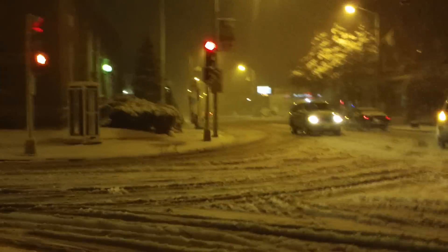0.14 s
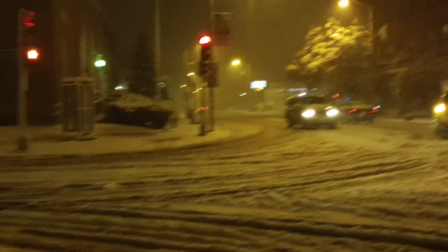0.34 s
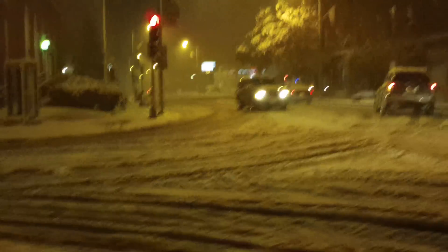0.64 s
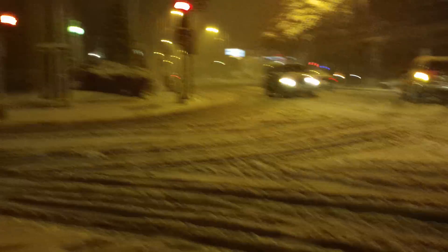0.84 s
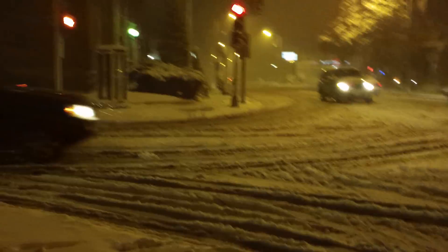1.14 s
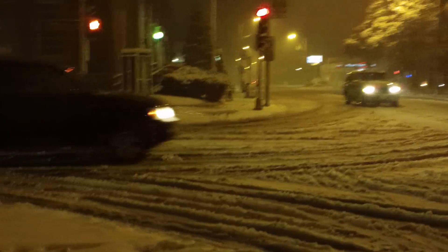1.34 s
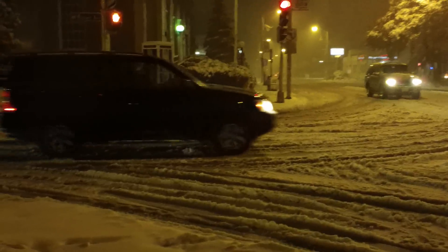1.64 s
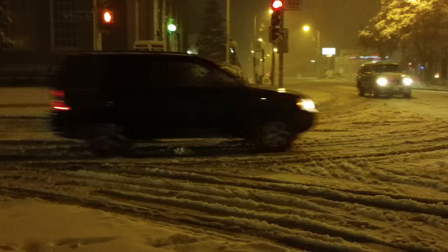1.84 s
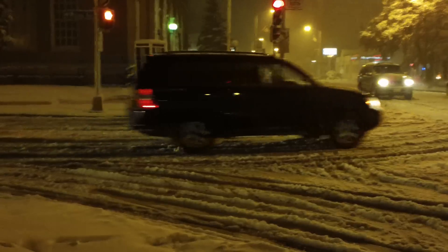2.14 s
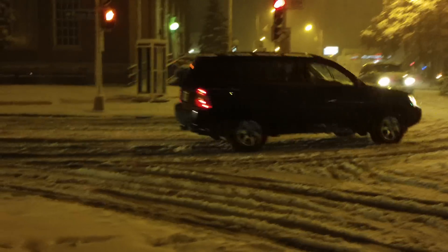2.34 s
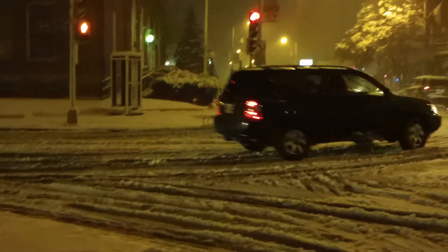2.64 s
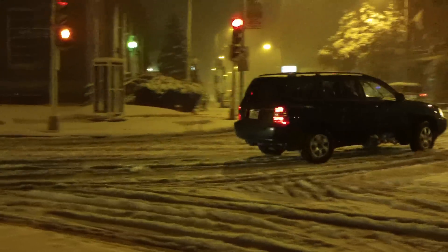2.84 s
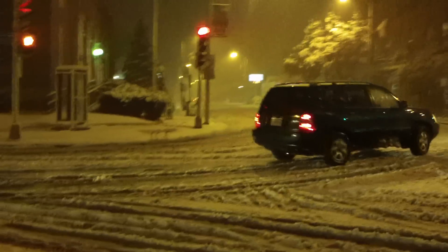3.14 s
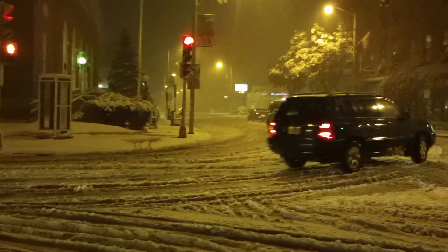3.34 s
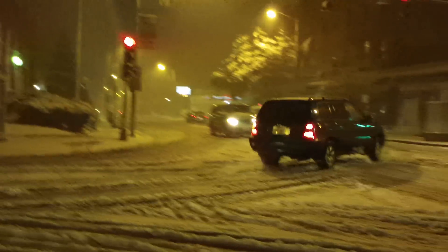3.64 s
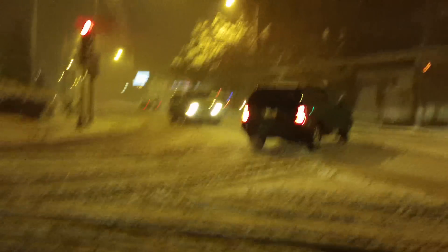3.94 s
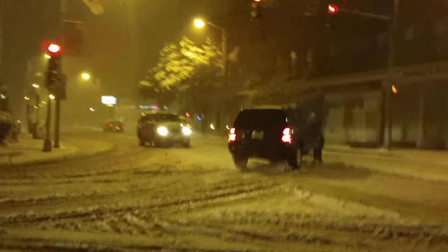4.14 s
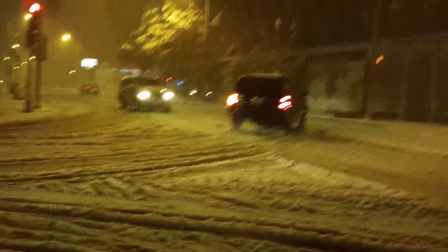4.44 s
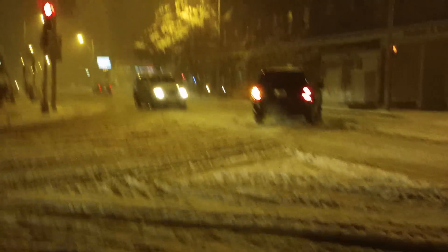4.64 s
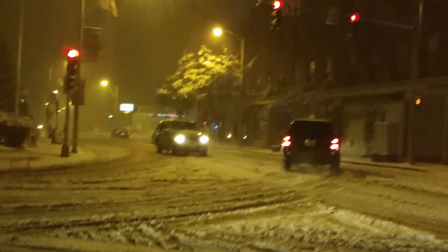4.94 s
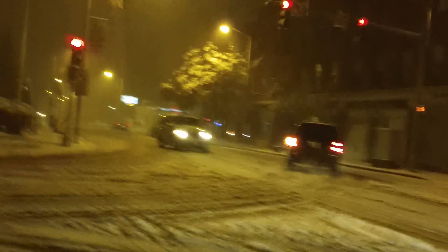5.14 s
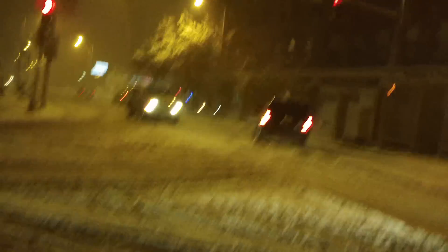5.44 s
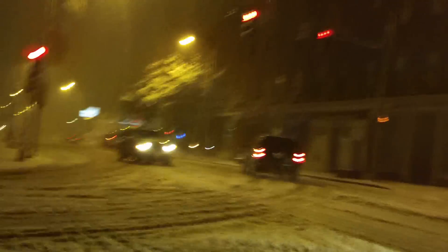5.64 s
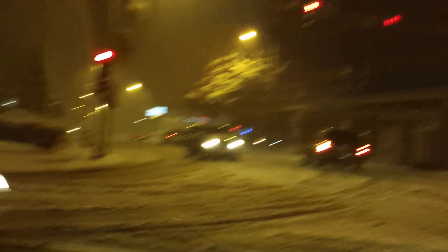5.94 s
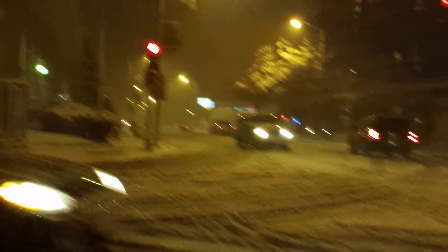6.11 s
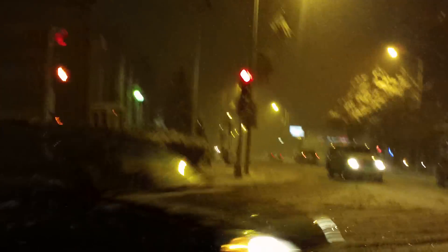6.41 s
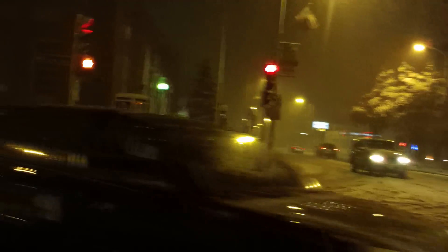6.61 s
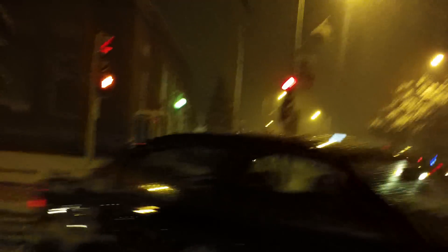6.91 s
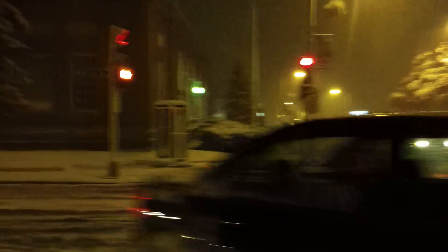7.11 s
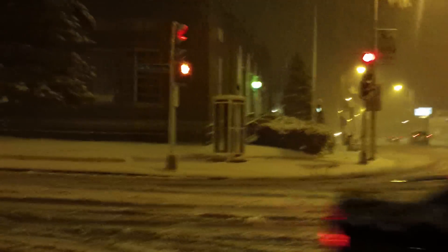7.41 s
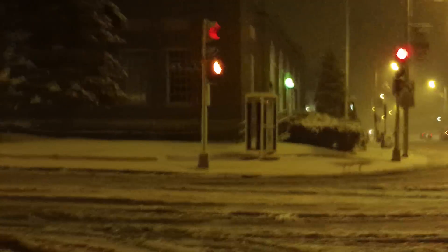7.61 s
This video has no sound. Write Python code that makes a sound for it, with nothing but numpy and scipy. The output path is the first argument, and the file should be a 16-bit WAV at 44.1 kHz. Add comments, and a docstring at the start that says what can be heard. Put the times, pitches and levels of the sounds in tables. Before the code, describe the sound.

An engine pulls hard with a brief gear whine through wet snow at night, then a second car splashes past close by.

```python
"""Cars in wet snow

Cars turn through slush: a large engine pulls, heard as sines on its firing orders, while a gear whines.
Tyres roar as half-octave bands of grainy noise; wind gusts lift the lowest of these bands.
A second car passes close by on its own firing orders, with splashes of grainy noise.
Crushed clods, wet drops, dull thuds and sharp ticks are short damped modes.
Two microphone ports of a phone hear near sounds by one path and the roar only partly alike."""
import sys
import numpy as np
from scipy import signal
from scipy.fft import rfft, irfft, next_fast_len
from scipy.io import wavfile
from scipy.ndimage import uniform_filter1d

SR = 44100
rng = np.random.default_rng(int(sys.argv[2]) if len(sys.argv) > 2 else 0)


def int16_out(signal):
    """Quantize to a 16-bit WAV file."""
    q = np.round(np.clip(np.atleast_2d(signal).T, -1, 1) * 32767)
    wavfile.write(sys.argv[1], SR, q.astype(np.int16))


N = 342657
T = np.arange(N) / SR
SIZE = next_fast_len(N)
HZ = np.maximum(np.arange(SIZE // 2 + 1) * SR / SIZE, 1)  # bin frequencies, kept above zero for logarithms
SOFT_TOP_HZ = 7600  # wet, soft contacts make next to nothing above this


def undb(db):
    """Decibel law: amplitude gain is ten to the power dB / 20."""
    return 10 ** (np.asarray(db) / 20)


def columns(table):
    """Linear interpolation in time: a gate faded at inner table ends, and each column at every sample."""
    s, *cols = np.transpose(table)
    since_start = T - s[0] + (s[0] <= 0)  # no fade where the table meets the start or end of the scene
    until_end = s[-1] - T + (s[-1] >= T[-1] - .01)
    gate = np.clip(np.minimum(since_start, until_end) / .05, 0, 1)
    return gate, [np.interp(T, s, c) for c in cols]


def over_hz(table):
    """Interpolation on a logarithmic frequency axis: each column at every bin."""
    hz, *cols = np.transpose(table)
    return [np.interp(np.log(HZ), np.log(hz), c) for c in cols]


def walk(rate):
    """Smoothed random modulation: values held 1 / rate s, then averaged twice; spread near 1."""
    hold = int(SR / rate)
    steps = np.repeat(rng.standard_normal(N // hold + 1), hold)
    return 1.3 * uniform_filter1d(uniform_filter1d(steps, hold), hold)[:N]


def ring(hz, decay_s, order=1):
    """Damped mode: the envelope peaks at 1 after decay_s / 10; a higher order starts softer, dies sooner."""
    t = np.arange(int(2 * decay_s * SR)) / SR
    x = 10 * t / decay_s
    return np.sin(2 * np.pi * hz * t) * (x * np.exp(1 - x)) ** order


def add(out, s, x):
    """Superposition: mix x into out from time s."""
    i = int(s * SR)
    out[..., i:i + x.shape[-1]] += x[..., :N - i]


def muffle(x, top_hz):
    """Low-pass filtering: a steep loss above top_hz."""
    return signal.sosfilt(signal.butter(8, top_hz, fs=SR, output="sos"), x)


def harmonics(hz, orders, levels_db, waver, flutter_db):
    """Harmonic series: sines locked to one slightly wavering phase, each fluttering about its rms level."""
    phase = 2 * np.pi * np.cumsum(hz * (1 + waver * walk(12))) / SR
    out = 0
    for order, db in zip(orders, levels_db):
        amplitude = np.sqrt(2) * undb(db + flutter_db * walk(15))
        out = out + amplitude * np.sin(order * phase + rng.uniform(0, 2 * np.pi))
    return out


def slush(length=N, grains_per_s=900, scatter_db=3.5, grain_db=-5):
    """Broadband excitation: white noise of air and water, plus impulses of snow grains breaking."""
    hit = rng.random(length) < grains_per_s / SR
    size_db = scatter_db * np.minimum(rng.exponential(size=length), 4)
    grains = hit * rng.choice([-1, 1], length) * undb(size_db)
    return rng.standard_normal(length) + undb(grain_db) * grains / grains.std()


# Pulling engine: t/s, firing rate f/Hz, level/dB of orders 1, 2 and 3
PULLING_ENGINE = [(0, 61.7, -49.5, -35, -25), (.45, 63.27, -52.5, -33, -30), (.75, 64.6, -53, -30, -25),
                  (1.05, 65.4, -52.5, -30, -27.5), (1.13, 65.7, -49.5, -27, -22.5),
                  (1.38, 65.8, -43, -31.5, -23.5), (1.55, 66.4, -53, -24.5, -23),
                  (1.8, 66.6, -44, -33.5, -20), (1.96, 66.6, -40, -36, -26.5),
                  (2.2, 67.2, -43.5, -44.5, -23), (2.38, 67.69, -43, -35, -27.5),
                  (2.52, 68.14, -42.5, -32, -36.5), (2.68, 68, -44.5, -33, -27),
                  (3.15, 69.03, -47.5, -31.5, -27), (3.5, 69.77, -48, -35, -31),
                  (3.8, 70.3, -42.5, -33.5, -33), (4.05, 70.63, -40.5, -33.5, -27.5),
                  (4.28, 70.1, -40, -36, -28), (4.42, 68, -52.5, -43, -37)]
# Its fourth firing order, strongest early on: t/s, level/dB
FOURTH_ORDER_LEVEL = [(0, -33), (.12, -34), (.33, -28), (.55, -32), (.65, -33), (.78, -33), (.9, -41),
                      (1.5, -47), (4.42, -46)]


def pulling_engine():
    """Periodic combustion: four harmonics of the firing rate rise and fall with engine speed."""
    gate, (hz, *levels_db) = columns(PULLING_ENGINE)
    levels_db += columns(FOURTH_ORDER_LEVEL)[1]
    return gate * harmonics(hz, [1, 2, 3, 4], levels_db, waver=.003, flutter_db=1.8)


def gliding_tone(table):
    """Frequency modulation: one sine follows a table of pitch and level."""
    gate, (hz, db) = columns(table)
    return gate * harmonics(hz, [1], [db], waver=.004, flutter_db=1.8)


# Gear whine: t/s, f/Hz, level/dB
GEAR_WHINE = [(0, 608, -36), (.12, 622, -39), (.3, 650, -42), (.45, 668, -44), (.62, 686, -53),
              (.7, 696, -36), (.85, 708, -41), (1.05, 724, -36), (1.16, 722, -40), (1.24, 718, -47),
              (1.5, 700, -52)]


def gear_whine():
    """Tonal gear noise: a single whine glides up, then slightly down."""
    return gliding_tone(GEAR_WHINE)


# Short hum above the engine: t/s, f/Hz, level/dB
UPPER_HUM = [(.1, 498, -46), (.2, 501, -39), (.34, 503, -32), (.55, 509, -37), (.64, 506, -45),
             (.71, 497, -36), (.86, 501, -39), (.95, 502, -50)]


def upper_hum():
    """Narrow-band tone: a short hum of nearly steady pitch swells and fades."""
    return gliding_tone(UPPER_HUM)


# Close car: t/s, firing rate f/Hz, level/dB of orders 2, 3 and 4
CLOSE_CAR = [(5.9, 45.62, -41.5, -41.5, -43), (6.15, 47.9, -36, -45.5, -41), (6.45, 47.5, -39.5, -54, -41),
             (6.68, 46.4, -44, -49, -37), (6.85, 46.68, -38.5, -41.5, -35), (7.05, 47.3, -45, -35, -41),
             (7.2, 46.4, -42.5, -37.5, -39), (7.35, 45.15, -40, -45.5, -43), (7.5, 44.8, -39.5, -47, -46),
             (7.77, 44.1, -40, -44.5, -46.5)]


def close_car():
    """Periodic combustion: the passing car sounds on orders 2 to 4 of a lower firing rate."""
    gate, (hz, *levels_db) = columns(CLOSE_CAR)
    return gate * harmonics(hz, [2, 3, 4], levels_db, waver=.005, flutter_db=1.5)


# Low booms: peak t/s, f/Hz, peak level/dB
LOW_BOOMS = [(4.66, 123.6, -35), (4.87, 152, -34), (7.45, 247, -27), (7.49, 170, -35), (7.62, 158, -31),
             (7.71, 152, -27)]


def booms(slope_db_per_s=110):
    """Exponential growth and decay: low tones swell and fade at the same rate in dB."""
    out = np.zeros(N)
    for s, hz, peak_db in LOW_BOOMS:
        level_db = peak_db - slope_db_per_s * abs(T - s)
        out += harmonics(hz, [1], [level_db], waver=.003, flutter_db=1.5)
    return out


# In the three level tables below only departures from the mean shape the sound, save for the low crunch,
# whose mean also sets the overall tyre level.
# Tyres in the snow: t/s, low crunch level/dB, high crunch level/dB, spray level/dB, hiss level/dB
TYRE_LEVELS = [(0, -35, -37.5, -39, -40.5), (.4, -34.5, -36, -37.5, -39.5), (1, -35, -38, -33.5, -37.5),
               (1.35, -34.5, -35.5, -34.5, -37.5), (1.7, -35, -37.5, -33.5, -38),
               (1.95, -35, -37, -38, -42.5), (2.35, -37, -33.5, -39, -42), (2.7, -36.5, -37, -39.5, -42.5),
               (3.05, -35.5, -38.5, -40, -45), (3.5, -35, -34, -38, -41), (3.9, -33, -36, -36, -39.5),
               (4.3, -34.5, -35.5, -35.5, -38.5), (4.8, -35, -36, -32, -35.5),
               (5.05, -35.5, -35, -33, -38.5), (5.38, -36.5, -36, -31.5, -40),
               (5.46, -34.5, -30, -32.5, -39.5), (5.58, -34, -32.5, -35, -41), (5.68, -34, -29, -36.5, -42),
               (5.78, -35, -32, -34, -41), (5.9, -37, -31, -34, -41.5), (6.12, -38, -32.5, -33.5, -41),
               (6.2, -34.5, -32, -34, -44), (6.28, -37.5, -31.5, -32.5, -41.5),
               (6.33, -39.5, -29.5, -30, -38.5), (6.45, -34.5, -32, -29, -37.5),
               (6.55, -38.5, -34.5, -34.5, -37.5), (6.62, -37.5, -34, -35, -39.5),
               (6.76, -37, -29, -34.5, -41.5), (6.86, -37, -30.5, -33, -41.5),
               (6.97, -33.5, -28.5, -33.5, -40), (7.12, -38, -29.5, -36, -41),
               (7.3, -32.5, -31, -33, -40.5), (7.4, -34, -32.5, -38.5, -45), (7.53, -33, -30, -30, -35.5),
               (7.77, -34.5, -29, -31, -37)]
# Band between spray and hiss: t/s, level/dB
FIZZ_LEVEL = [(0.0, -43), (0.43, -43.5), (0.99, -41.5), (1.6, -42.5), (1.88, -44), (2.25, -43.5),
              (2.38, -45.5), (2.88, -45.5), (4.78, -44), (5.67, -45), (6.06, -44), (6.56, -40), (7.12, -41),
              (7.29, -44.5), (7.49, -44), (7.77, -42.5)]
# Finest spray in the treble: t/s, level/dB
SPATTER_LEVEL = [(0, -58.5), (1.5, -61), (3, -64), (5.5, -63.5), (6.3, -56), (7.2, -54.5), (7.77, -65.5)]
# Middle of each layer, deep to spatter: f/Hz
LAYER_CENTRES = [45, 130, 350, 800, 1550, 2500, 4500, 10000]
# Roar spectrum, rescaled as a whole by the low crunch: f/Hz, relative level per hertz/dB
ROAR_SPECTRUM = [(25, -30), (60, -13), (150, -4), (400, -6), (800, -10.5), (1150, -15.5), (1350, -11),
                 (1600, -10.5), (1800, -13.5), (2100, -14.5), (2450, -20), (2900, -19.5), (3500, -22),
                 (4100, -17), (4600, -23.5), (5100, -25.5), (6300, -26), (8500, -44), (9800, -80.5),
                 (11000, -50), (14700, -49), (15500, -92)]


def tyres(swell_db=-0.1, flicker_db=0.63, clump_db=1.0):
    """Filter-bank synthesis: two unrelated roars, each half-octave band led by its nearest layers."""
    low, high, spray, hiss = columns(TYRE_LEVELS)[1]
    fizz, spatter = columns(FIZZ_LEVEL)[1] + columns(SPATTER_LEVEL)[1]
    layers_db = wind_rumble_levels() + [low, high, spray, fizz, hiss, spatter]
    spectra = rfft([slush(), slush()], SIZE) * undb(over_hz(ROAR_SPECTRUM)[0])
    out, swell = 0, walk(8)
    for octave in np.arange(4.5, 14.5, .5):  # log2 of the band centre in Hz
        band = np.cos(np.pi * np.clip(np.log2(HZ) - octave, -.5, .5))  # neighbours sum to constant power
        place = np.interp(octave, np.log2(LAYER_CENTRES), np.arange(len(LAYER_CENTRES)))
        db = swell_db * swell + flicker_db * walk(12)
        db = db + clump_db * (octave > 10) * walk(25)
        for k, layer_db in enumerate(layers_db):
            db = db + max(1 - abs(place - k), 0) * (layer_db - layer_db.mean())
        out = out + undb(db) * irfft(spectra * band, SIZE)[:, :N]
    crunch = irfft(spectra[0] * ((HZ > 290) & (HZ < 550)), SIZE)[:N]
    return out * undb(low.mean()) / crunch.std()


# Flung lumps: t/s, dull, middle, core and bright part level/dB, left minus right level/dB
FLUNG_LUMPS = [(6.2589, -16, -18, -21, -70, -6), (6.3855, -22, -25, -21, -55, -6),
               (6.6541, -38, -35, -33, -39, 9), (6.8522, -21, -20, -28, -45, 0),
               (6.9280, -29, -30, -27, -65, -2), (7.0131, -28, -25, -33, -65, -3),
               (7.0547, -21, -24, -23, -36, -8), (7.0575, -22, -25, -27, -46, -8),
               (7.1918, -38, -36, -36, -29, 11), (7.2201, -35, -20, -26, -22, 8),
               (7.2431, -35, -30, -34, -36, 6), (7.3117, -16, -21, -4, -18, -7),
               (7.3143, -22, -25, -21, -37, -7), (7.3150, -17, -23, -26, -47, -8),
               (7.4404, -34, -34, -25, -44, -2)]
# Modes of a lump: f/Hz, nominal decay/s, level/dB within its part, part (0 dull, 1 middle, 2 core, 3 bright)
LUMP_MODES = [(1900, .006, 0, 0), (2700, .005, 4, 0), (3500, .0045, 3, 1), (4400, .004, 3, 1),
              (5900, .004, 0, 2), (7400, .003, -7, 2), (11800, .003, -4, 3), (13700, .003, -4, 3)]


def ticks(grit_db=-11, grit_t60_s=.02):
    """Impact excitation: each lump rings short modes, then crumbles as noise convolved with them."""
    out, t = np.zeros((2, N)), np.arange(int(grit_t60_s * SR)) / SR
    for s, *parts_db, pan_db in FLUNG_LUMPS:
        tick = np.zeros(999)
        for hz, decay_s, mode_db, part in LUMP_MODES:
            detune = 1 + .04 * rng.standard_normal()
            mode = undb(parts_db[part] + mode_db) * ring(hz * detune, 1.02 * decay_s, order=2)
            tick += muffle(np.pad(mode, (0, 999))[:999], 1.3 * hz)
        grit = rng.standard_normal(len(t)) * undb(-60 * t / grit_t60_s)
        grit *= undb(grit_db) / np.sqrt(np.sum(grit ** 2))
        grit[0] = 1  # the tick itself
        add(out, s, np.outer(undb([pan_db / 2, -pan_db / 2]), np.convolve(tick, grit)))
    return out


# Wheels breaking through ruts: t/s, envelope peak level/dB, f/Hz
RUT_THUDS = [(3.555, -21.5, 268), (3.962, -11.5, 560), (4.189, -14, 295), (4.477, -19, 276),
             (4.801, -17.5, 350), (5.422, -20.5, 245), (5.454, -19.5, 694), (5.515, -17, 245),
             (5.689, -20, 528), (5.884, -18.5, 262), (6.296, -12, 675), (6.31, -23.5, 249),
             (6.319, -12, 560), (6.33, -17, 532), (6.335, -19.5, 407), (6.361, -17, 498), (6.749, -12, 620),
             (6.967, -18, 743), (7.052, -13.5, 517), (7.316, -15.5, 910), (7.519, -17, 244)]


def thuds():
    """Heavily damped resonance: each rut gives one dull knock of a few cycles."""
    out = np.zeros(N)
    for s, db, hz in RUT_THUDS:
        add(out, s, muffle(undb(db) * ring(hz, 5 / hz), SOFT_TOP_HZ))
    return out


# Slush thrown up by the close car's wheels: peak t/s, half length/s, level/dB, centre f/Hz
WHEEL_SPLASHES = [(6.33, .02, -36, 1400), (6.344, .005, -26, 1390), (6.364, .005, -22, 1570),
                  (6.397, .015, -31.5, 1730), (6.456, .02, -27.5, 1495), (6.467, .03, -35.5, 3620),
                  (6.591, 0.013, -26, 1560), (6.607, 0.032, -38.5, 3600), (6.66, .01, -36, 1500)]


def splashes():
    """Resonant filtering: grainy noise takes the pitch of a damped mode and swells as a Gaussian."""
    out = np.zeros(N)
    for s, half_s, db, hz in WHEEL_SPLASHES:
        t = np.arange(-int(3 * half_s * SR), int(3 * half_s * SR)) / SR
        wet = np.convolve(slush(len(t)), ring(hz, 4 / hz), "same")
        add(out, s + t[0], undb(db) * wet / wet.std() * np.exp(-(t / half_s) ** 2))
    return out


def clods(per_s=60, size_db=-28, scatter_db=3.0):
    """Random impulse process: small clods of snow are crushed, louder when the high crunch swells."""
    out, crunch_db = np.zeros(N), columns(TYRE_LEVELS)[1][1]
    for place, pitch, size in rng.random((int(per_s * N / SR), 3)):
        hz = 350 * 2 ** (1.5 * pitch)
        db = size_db - scatter_db * np.log(size + 0.043)  # a few are much larger than the rest
        db += 0.95 * (crunch_db[int(place * N)] - crunch_db.mean())
        add(out, place * N / SR, undb(db) * ring(hz, 4 / hz))
    return out


def drops(per_s=150, size_db=-38, scatter_db=2.0, bunch_db=4.0, low_hz=1200, octaves=2.8, turns=8):
    """Modulated impulse process: wet blobs plop in bunches, louder when the spray swells."""
    out, spray_db = np.zeros(N), columns(TYRE_LEVELS)[1][2]
    for place, pitch, size in rng.random((int(per_s * N / SR), 3)):
        hz = low_hz * 2 ** (octaves * pitch ** 2)
        db = -scatter_db * np.log(size + 0.061) - 8 * pitch ** 2  # higher drops are weaker
        add(out, place * N / SR, undb(db) * ring(hz, turns / hz))
    return out * undb(size_db + spray_db - spray_db.mean() + bunch_db * walk(9))


# Wind gusts on the ports: peak t/s, half length/s, level/dB over the calm
WIND_GUSTS = [(0, 0.059, 6), (1.351, 0.43, 4.5), (2.203, .3, 6.5), (3.816, 0.13, 16.5), (4.2, 0.38, 14.5),
              (4.853, 0.38, 4), (6.151, 0.33, 4), (6.747, 0.25, 2), (7.4, 0.24, 10), (7.77, 0.23, 14)]


def wind_rumble_levels(deep_db=-58, growl_db=-41, growl_follows=0.21, growl_rise_db_per_s=0.08):
    """Wind-induced noise: gusts lift the deep level, and the growl in part; tyres() removes the means."""
    gust_db = np.max([db / (1 + ((T - s) / half_s) ** 4) for s, half_s, db in WIND_GUSTS], axis=0)
    return [deep_db + gust_db, growl_db + growl_follows * gust_db + growl_rise_db_per_s * T]


# Microphone ports: f/Hz, left minus right level/dB, right lead/half turns, likeness of the roar (0 to 1)
MICROPHONE_PORTS = [(100, -1.6, -.07, .96), (350, -4.3, .01, .97), (800, -4.7, .13, .79),
                    (1150, 2, .5, .14), (1550, -8.6, .83, .56), (2100, 1.6, 1.36, .64),
                    (2600, 1.3, .97, .12), (3300, -1.8, .59, .45), (4300, 4.4, .96, .5),
                    (5200, -1.3, .79, .6), (6000, -5.3, .88, .81), (7300, -2.5, .98, .85), (8300, 0, 1, 1)]
# Narrow dip in the treble of near sounds: f/Hz, half width f/Hz, level/dB
TREBLE_DIP = (10100, 400, -10)


def scene(near_lag_s=9e-6):
    """Interaural-style coherence: near sounds share one path, the roar from all around is partly alike."""
    balance_db, lead, alike = over_hz(MICROPHONE_PORTS)
    alike = np.clip(alike, 0, 1)
    tones = pulling_engine() + gear_whine() + upper_hum() + close_car() + booms()
    soft = muffle(clods() + drops() + splashes(), SOFT_TOP_HZ)
    near = rfft(tones + thuds() + soft + ticks(), SIZE)
    roar, other = rfft(tyres(), SIZE)
    dip_hz, half_width_hz, dip_db = TREBLE_DIP
    near = near * undb(dip_db / (1 + ((HZ - dip_hz) / half_width_hz) ** 4))
    left = near[0] + roar
    lagged = near[1] * np.exp(-2j * np.pi * HZ * near_lag_s)  # extra path to the right port
    right = (lagged + alike * roar) * np.exp(1j * np.pi * lead) + np.sqrt(1 - alike ** 2) * other
    return irfft([left * undb(balance_db / 2), right * undb(-balance_db / 2)], SIZE)[:, :N]


def record(dry, top_hz=16500):
    """Saturation and band limiting: the phone clips at full scale, then cuts the top."""
    return signal.sosfilt(signal.ellip(8, .2, 80, top_hz, fs=SR, output="sos"), np.clip(dry, -1, 1))


dry = scene()
out = record(dry)
int16_out(out)
```